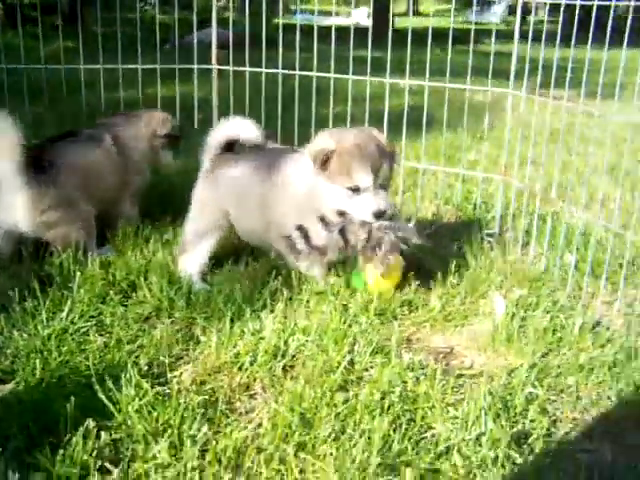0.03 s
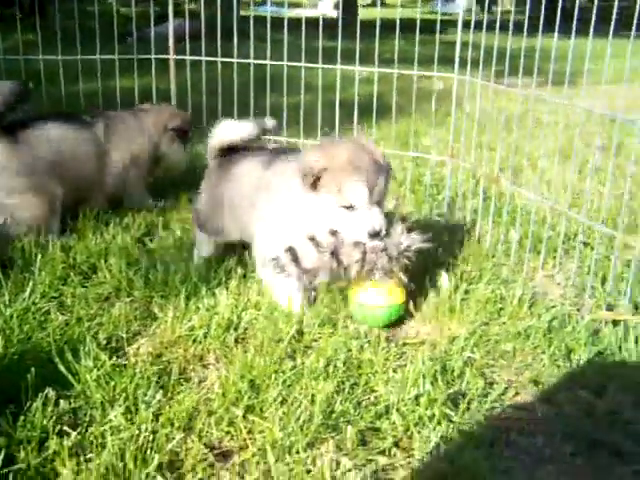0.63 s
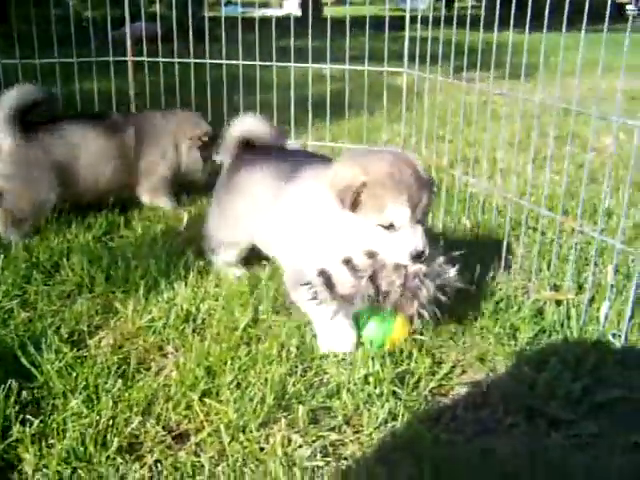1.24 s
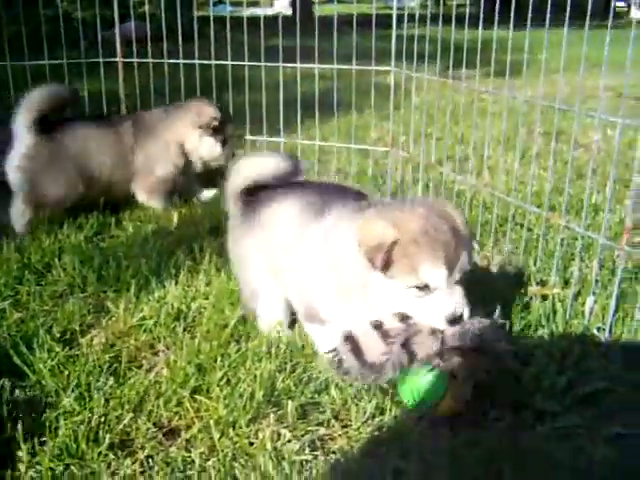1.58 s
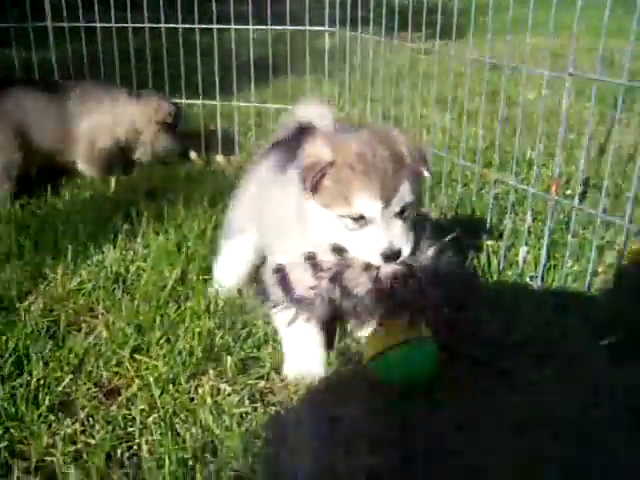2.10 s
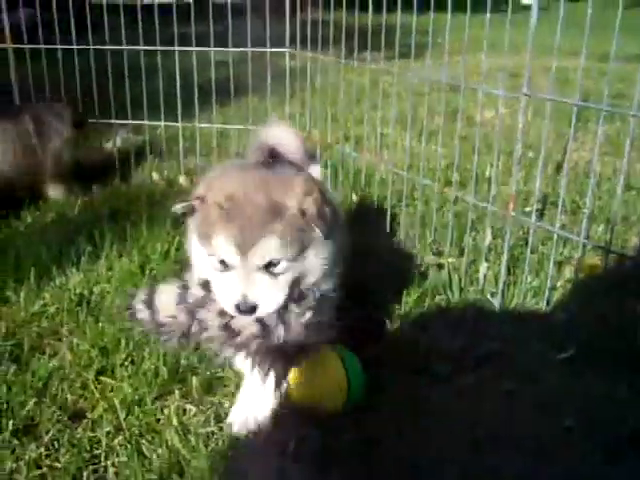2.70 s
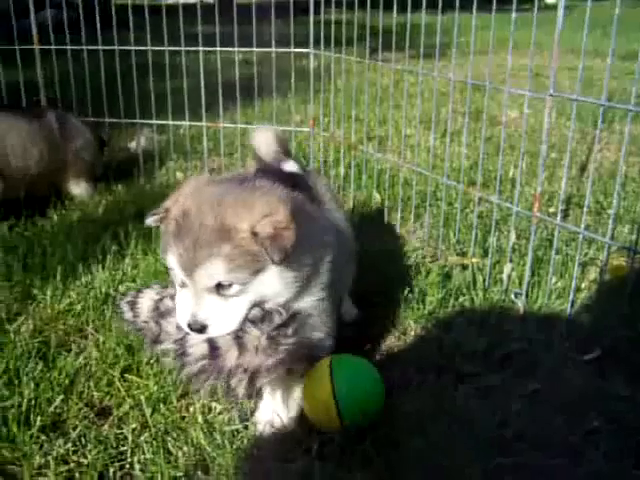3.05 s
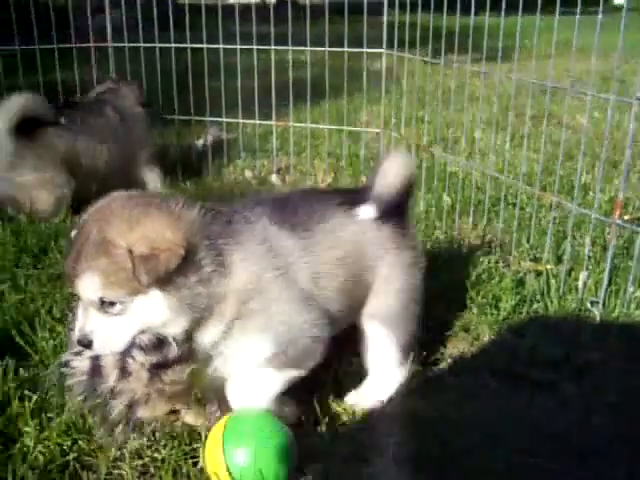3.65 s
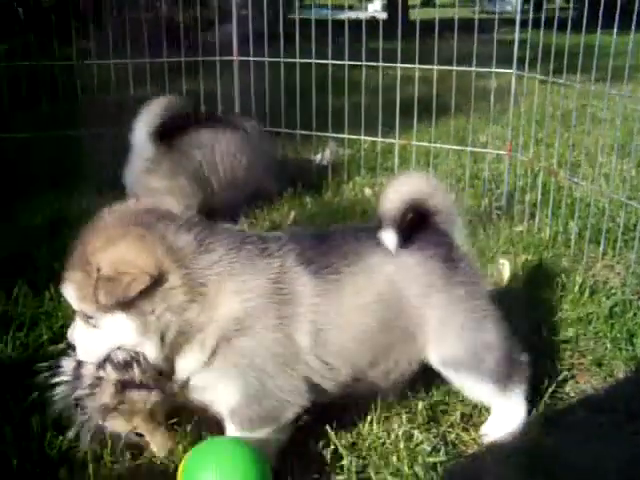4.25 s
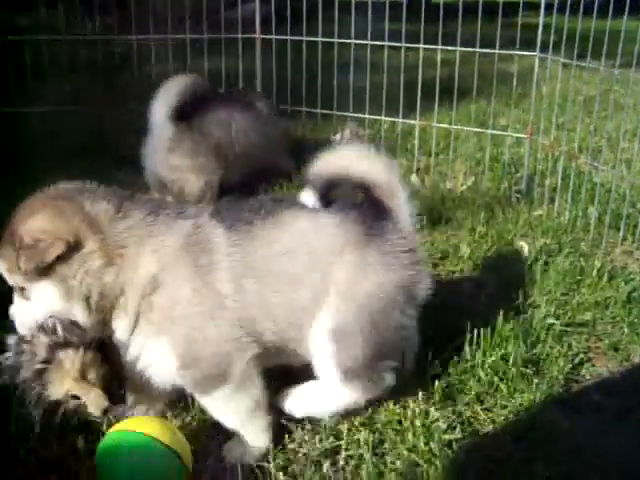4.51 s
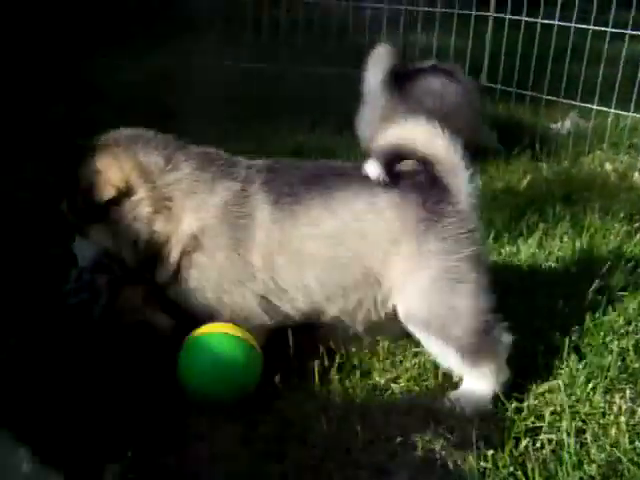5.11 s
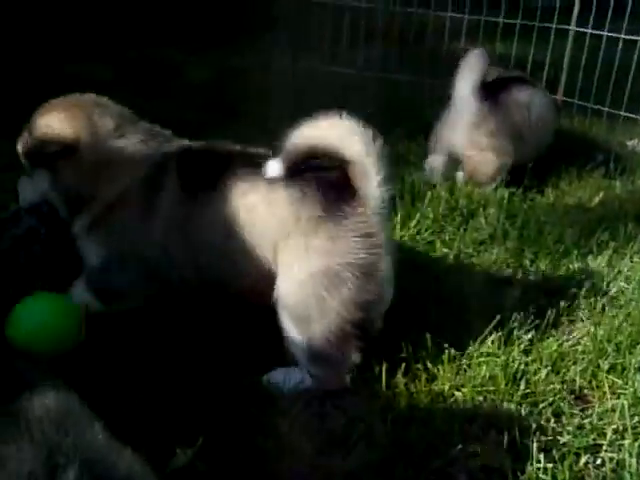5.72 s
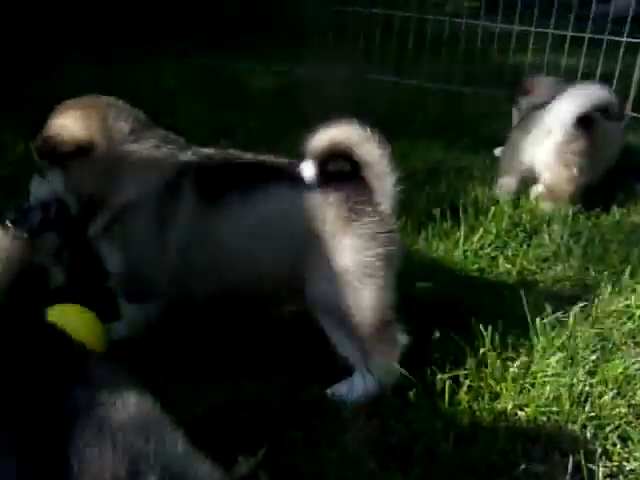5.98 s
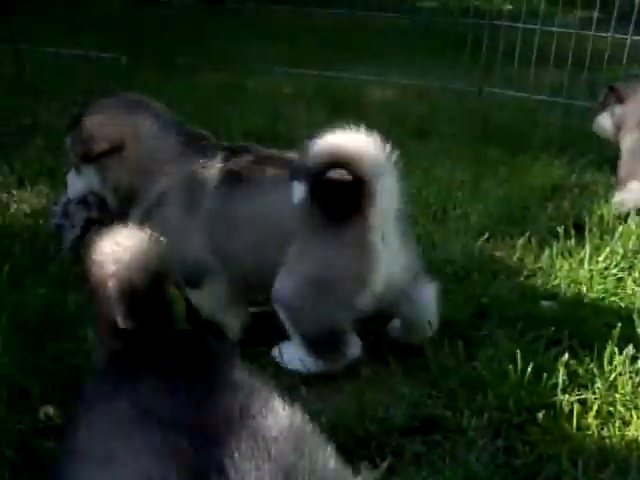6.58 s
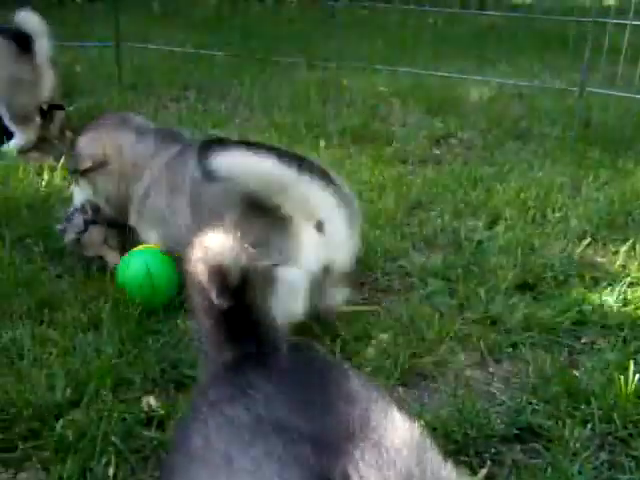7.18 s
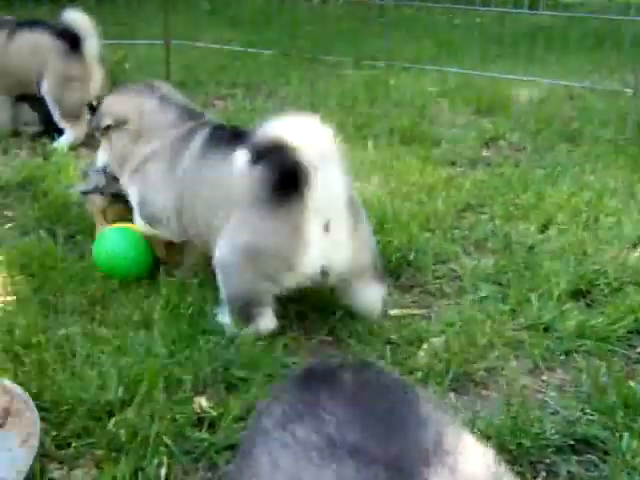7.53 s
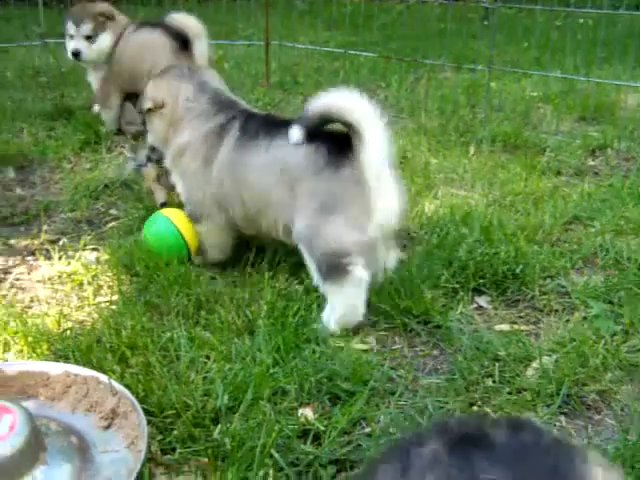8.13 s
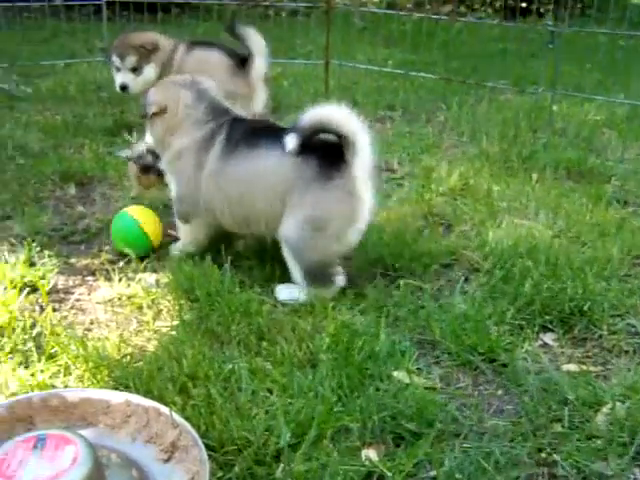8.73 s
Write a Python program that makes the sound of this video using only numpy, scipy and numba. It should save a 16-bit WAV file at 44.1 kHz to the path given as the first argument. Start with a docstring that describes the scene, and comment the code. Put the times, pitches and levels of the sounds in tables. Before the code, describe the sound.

Grass swishes and crackles under puppies' paws, then a close bird trills loudly and chips, above a low far-off engine hum.

```python
"""A bird close by gives one fast trill: rising whistles that slow and end in harsh two-voiced chips.
On the lawn, puppies with a soft toy and a ball brush through the grass and snap stalks; hard plastic
clacks near the microphone. Far off, an engine drones and a second bird calls thinly over a hiss of
leaves and traffic. Heard in mono from a small camera, whose shell rings when rubbed and whose gain
control ducks under the near bird."""
import sys
import numpy as np
from scipy import signal
from scipy.fft import rfft, irfft, next_fast_len
from scipy.io import wavfile
from scipy.ndimage import uniform_filter1d
from numba import njit

SR = 44100
rng = np.random.default_rng(int(sys.argv[2]) if len(sys.argv) > 2 else 0)


def inscribe(sig):
    """Save sig as 16-bit PCM at rate SR to the path in sys.argv[1].

    A 1-D sig is mono; a 2-D sig holds one channel per row.
    Samples are clipped to [-1, 1] before scaling.
    """
    pcm = np.round(np.clip(np.atleast_2d(sig).T, -1, 1) * 32767)
    wavfile.write(sys.argv[1], SR, pcm.astype(np.int16))


N = 386067
T = np.arange(N) / SR

# spectrum of grass blades brushing: frequency_hz, density_db
SWISH_SPECTRUM = [(1200, -26.5), (2100, -16), (2550, -4.5), (3000, -1), (3300, -2.5), (3800, 0), (4300, -1),
                  (4900, -8), (5800, -31.5)]
# spectrum of the crisp treble of the grass: frequency_hz, density_db
CRISP_SPECTRUM = [(3800, -22.5), (4700, -5), (5400, 9.5), (5750, -3), (6250, 2.5), (7000, -1.5),
                  (7600, -6.5), (8200, -29)]


def undb(db):
    """Decibels to gain."""
    return 10 ** (np.asarray(db) / 20)


def unit(x):
    """Scale to rms 1."""
    return x / np.sqrt(np.mean(x ** 2))


def curves(rows):
    """Each column after the times, joined by straight lines over the scene."""
    times, *columns = np.transpose(rows)
    return [np.interp(T, times, column) for column in columns]


def add(out, start_s, x):
    """Mix x into out from start_s on."""
    i = max(int(start_s * SR), 0)
    out[i:i + len(x)] += x[:N - i]


def colour(x, spectrum):
    """Give x a smooth spectrum that falls 34 dB an octave beyond its ends; rms 1."""
    hz, db = np.transpose(spectrum)
    size = next_fast_len(len(x))
    octave, known = np.log2(np.fft.rfftfreq(size, 1 / SR) + 1), np.log2(hz)
    outside = np.abs(octave - np.clip(octave, known[0], known[-1]))
    gain = undb(np.interp(octave, known, db) - 34 * outside)
    return unit(irfft(rfft(x, size) * gain, size)[:len(x)])


def walk(rate_hz):
    """Smooth random drift with a spread near 1."""
    hold = int(SR / rate_hz)
    steps = np.repeat(rng.standard_normal(N // hold + 1), hold)
    return 1.14 * uniform_filter1d(uniform_filter1d(steps, hold), hold)[:N]


def patchy(x, depth_db):
    """Let neighbouring narrow bands swell and sink on their own; rms 1."""
    _, _, bands = signal.stft(x, nperseg=512)
    patches = rng.standard_normal(bands.shape)
    for _ in range(2):
        patches = uniform_filter1d(uniform_filter1d(patches, size=4, axis=0), size=17, axis=1)
    return unit(signal.istft(bands * undb(depth_db * unit(patches)))[1][:N])


def crackle(spread_db, hiss):
    """Dense tiny clicks of unequal size over a smooth hiss."""
    clicks = rng.standard_normal(N) * (rng.random(N) < 0.06)
    sizes = undb(spread_db * np.minimum(rng.exponential(size=N), 4))
    return unit(clicks * sizes) + hiss * rng.standard_normal(N)


def ring(modes, pitch_factor=1):
    """Struck modes, each dying at its own rate."""
    t = np.arange(2048) / SR
    return sum(undb(db - 60 * t / t60) * np.sin(2 * np.pi * hz * pitch_factor * t)
               for hz, db, t60 in modes)


def whistle(length_s, pitches_hz, attack, release, rasp, tremble=0.7, tremble_hz=190):
    """A note bent through start, middle and end pitch; attack and release are shares of its length."""
    u = np.linspace(0, 1, int(length_s * SR))
    hz = np.polyval(np.polyfit([0, 0.5, 1], pitches_hz, 2), u)
    shake = np.interp(u * length_s, np.arange(200) * 0.0007, rng.standard_normal(200))
    phase = 2 * np.pi * np.cumsum(hz * (1 + rasp * shake)) / SR
    swell = np.sin(np.pi / 2 * np.clip(np.minimum(u / attack, (1 - u) / release), 0, 1))
    quiver = 1 + tremble * u * np.sin(2 * np.pi * (tremble_hz * length_s * u + rng.random()))
    return swell * quiver * np.sin(phase)


def scatter(x, delay_s, t60_s, level_db):
    """Diffuse echo that arrives after a delay and dies away."""
    t = np.arange(SR) / SR
    tail = rng.standard_normal(SR) * undb(-60 * t / t60_s)
    out = np.zeros(N)
    add(out, delay_s, signal.fftconvolve(x, tail / np.linalg.norm(tail))[:N])
    return out * undb(level_db)


def air(hiss_db=-31.06):
    """Even hiss of far leaves and traffic, over a low rush that grows toward the end."""
    # spectrum of the hiss: frequency_hz, density_db
    hiss_spectrum = [(100, -38), (170, -0.5), (250, -1), (542, -8), (712, -6), (892, -7.5), (1420, -5),
                     (2160, -6.5), (2500, -7.5), (2800, -18), (3180, -10), (3510, -7), (6890, -14.5),
                     (7970, -26), (10400, -49.5), (17500, -120)]
    # spectrum of the rush: frequency_hz, density_db
    rush_spectrum = [(200, -5), (330, 1), (500, 0.5), (800, -23.5)]
    # rise of the rush: time_s, level_db
    rush_levels = [(0, -57), (4.5, -55), (5.3, -42), (6.5, -38.5), (7.3, -38), (8.75, -38)]
    hiss = patchy(colour(rng.standard_normal(N), hiss_spectrum), depth_db=1.6)
    hiss *= undb(hiss_db + 0.69 * walk(4.5))
    rush = colour(rng.standard_normal(N), rush_spectrum) * undb(curves(rush_levels)[0])
    return hiss + rush


def far_engine(pitch_hz=80.33, slows_at_s=2.9, sag_hz_per_s=1.1, waver_hz=0.4, waver_db=0.47):
    """A distant engine holds its speed, then slows: three wavering tones sink over a rumble."""
    # spectrum of the rumble: frequency_hz, density_db
    rumble_spectrum = [(20, -20), (32, -10.5), (44, -3), (60, -2.5), (100, 3), (150, 0), (200, -4),
                       (300, -12.5), (500, -24), (900, -47.5)]
    # loudness of the rumble and the low tone alike: time_s, level_db
    drone_levels = [(0, -32.5), (1.5, -34.5), (2.9, -32), (4.8, -33), (5.3, -29.5), (6.3, -30),
                    (6.7, -26.5), (7.2, -32), (8.75, -31.5)]
    # swells of the high tone: time_s, level_db
    high_levels = [(0, -35.5), (1.35, -38), (1.9, -31), (2.4, -35), (2.9, -26.5), (3.65, -32.5), (4, -26.5),
                   (4.26, -41), (4.9, -35.5), (5.2, -26.5), (5.95, -36), (6.65, -25.5), (7.1, -32),
                   (8.75, -30.5)]
    low_hz = pitch_hz - sag_hz_per_s * np.maximum(T - slows_at_s, 0)
    drone_db, high_db = curves(drone_levels)[0], curves(high_levels)[0]
    out = undb(drone_db) * colour(rng.standard_normal(N), rumble_spectrum)
    for hz, db in [(low_hz / 2, drone_db - 15), (low_hz, drone_db), (low_hz * 1.6, high_db)]:
        phase = 2 * np.pi * np.cumsum(hz + waver_hz * walk(8)) / SR
        out += np.sqrt(2) * undb(db + waver_db * walk(10)) * np.sin(phase)
    return out


def far_bird(octave_db=-11):
    """Thin distant calls with a faint octave, half lost in their own echo."""
    # whistled calls: start_s, length_s, start_hz, middle_hz, end_hz, level_db
    calls = [(8.187, 0.056, 3180, 3255, 3320, -21), (8.225, 0.092, 3350, 3550, 3700, -29),
             (8.263, 0.053, 3150, 3200, 3130, -21.5)]
    song = np.zeros(N)
    for start_s, length_s, *pitches_hz, db in calls:
        for harmonic, gain in [(1, undb(db)), (2, undb(db + octave_db))]:
            tone = whistle(length_s, harmonic * np.array(pitches_hz), attack=0.26, release=0.27, rasp=0.043)
            add(song, start_s, gain * tone)
    return song + scatter(song, delay_s=0.023, t60_s=0.45, level_db=-7)


def camera_rubs(gain_db=-6.5):
    """Gritty friction swells and fades in the narrow resonances of the camera's plastic shell."""
    # rubs on the shell: start_s, length_s, pitch_hz, relative_db
    rubs = [(1.841, 0.12, 3660, -25.5), (1.963, 0.11, 3800, -27), (2.341, 0.052, 3630, -23.5),
            (2.467, 0.05, 3680, -27.5), (3.34, 0.092, 3540, -21), (3.935, 0.056, 3640, -20.5),
            (4.303, 0.1, 3230, -21), (4.715, 0.11, 3620, -24), (7.19, 0.07, 3870, -21.5),
            (7.55, 0.2, 3760, -28)]
    # resonances of the shell: pitch_factor, width_hz, relative_db
    shell_modes = [(.785, 330, -5.5), (1, 260, 2.5), (1.92, 500, -19.5)]
    out, grit = np.zeros(N), crackle(spread_db=7.5, hiss=0.22)
    for start_s, length_s, pitch_hz, db in rubs:
        friction = grit[int(start_s * SR):][:int(length_s * SR)]
        friction = friction * np.sqrt(np.hanning(len(friction)))
        for factor, width_hz, mode_db in shell_modes:
            b, a = signal.iirpeak(pitch_hz * factor, pitch_hz * factor / width_hz, fs=SR)
            ringing = unit(signal.lfilter(b, a, signal.lfilter(b, a, friction)))
            add(out, start_s, undb(db + mode_db + gain_db) * ringing)
    return out


def grass(attack_share=0.25):
    """Blades brush and crackle as the puppies step and drag the toy over the lawn."""
    # soft shuffling under the strokes: time_s, swish_db, crisp_db
    shuffle = [(0, -42, -44), (1.3, -33.5, -38.5), (3.1, -34.5, -39.5), (4.1, -32, -38), (5, -32, -41.5),
               (5.6, -25.5, -34), (6.4, -26, -35.5), (6.9, -26.5, -35), (7.4, -32, -39.5), (8, -32, -49),
               (8.75, -29.5, -45)]
    # strokes of a paw or the toy: start_s, length_s, swish_db, crisp_db
    strokes = [(0.135, 0.33, -30, -32), (0.664, 0.23, -33, -33), (1.077, 0.033, -24.5, -26),
               (1.884, 0.13, -27.5, -33), (1.996, 0.027, -36, -23.5), (2.25, 0.42, -30, -43),
               (2.736, 0.14, -32, -34), (2.83, 0.14, -32, -32), (3.178, 0.24, -31.5, -30),
               (3.318, 0.23, -26.5, -33), (3.54, 0.091, -29.5, -32), (3.7, .17, -32, -34),
               (3.95, 0.098, -28, -28.5), (4.202, 0.36, -26.5, -30), (4.28, 0.19, -26.5, -32),
               (4.45, .14, -27, -36), (4.646, 0.2, -27.5, -26.5), (4.749, 0.22, -24.5, -30.5),
               (5.124, 0.11, -24, -31.5), (5.215, 0.31, -24.5, -30), (5.41, 0.31, -24.5, -39),
               (5.67, 0.097, -19, -29), (5.797, .06, -14.5, -27), (6.675, 0.13, -18.5, -37),
               (7.104, 0.22, -27, -31), (7.184, 0.22, -23, -29.5), (7.403, 0.25, -27.5, -45),
               (7.518, 0.25, -23.5, -28.5), (7.698, 0.26, -28.5, -35), (8.115, 0.28, -45, -37),
               (8.626, 0.2, -29.5, -30)]
    swish_power, crisp_power = undb(curves(shuffle)) ** 2
    for start_s, length_s, swish_db, crisp_db in strokes:
        u = np.linspace(0, 1, int(length_s * SR))
        swell = np.sin(np.pi / 2 * np.interp(u, [0, attack_share, 1], [0, 1, 0])) ** 2
        add(swish_power, start_s, undb(swish_db) ** 2 * swell)
        add(crisp_power, start_s, undb(crisp_db) ** 2 * swell)
    flutter = walk(70)
    # the colour shifts as the rubbing spot changes
    swish = patchy(colour(crackle(spread_db=3.5, hiss=0.98), SWISH_SPECTRUM), depth_db=2.5)
    crisp = patchy(colour(crackle(spread_db=5.5, hiss=0.74), CRISP_SPECTRUM), depth_db=4.5)
    swish *= undb(2.3 * flutter) * np.sqrt(swish_power)
    crisp *= undb(3.5 * flutter) * np.sqrt(crisp_power)
    return swish + crisp


def stalk_snaps(decay_s=0.0041, faint_count=9, faint_db=(-26.5, -27.5, -31), spread_db=2):
    """Stalks break under paws, each a dull knock and a short crack; faint ones come at random."""
    # breaking stalks: start_s, crack_db, knock_db, treble_db
    snaps = [(.864, -33, -18, -39), (1.081, -22, -25, -19), (1.455, -16, -10, -21), (1.462, -23, -17, -20),
             (1.661, -17.5, -19.5, -40), (1.875, -30, -30, -17), (2.009, -19, -29, -12.5),
             (2.89, -14, -18, -30), (2.97, -16, -35, -28), (3.218, -18, -22, -28), (3.492, -17.5, -38, -28),
             (3.543, -11, -34, -30), (3.564, -13.5, -35, -31), (3.667, -19, -30, -24),
             (3.714, -15, -28, -24), (3.788, -16, -24, -28), (3.832, -17, -30, -39),
             (4.037, -12, -16.5, -33), (4.667, -27, -38, -18.5), (4.738, -17.5, -19.5, -18),
             (4.873, -12, -19, -31), (5.451, -6, -16, -16), (5.457, -10.5, -14, -27),
             (7.126, -15, -22, -36), (7.286, -26, -16, -35), (8.635, -28, -15.5, -36)]
    # modes of the dull knock: pitch_hz, level_db, t60_s
    knock_modes = [(340, -9.5, 0.016), (740, 2, 0.0064), (1250, -0.5, 0.0014), (2010, 5.5, 0.0032)]
    faint_snaps = [(rng.uniform(0, N / SR), *rng.normal(faint_db, spread_db)) for _ in range(faint_count)]
    out, t = np.zeros(N), np.arange(2048) / SR
    for start_s, crack_db, knock_db, treble_db in snaps + faint_snaps:
        crack = undb(crack_db) * colour(rng.standard_normal(len(t)), SWISH_SPECTRUM)
        treble = undb(treble_db) * colour(rng.standard_normal(len(t)), CRISP_SPECTRUM)
        knock = undb(knock_db) * ring(knock_modes)
        add(out, start_s, (crack + treble) * np.exp(-t / decay_s) + knock)
    return out


def plastic_clacks():
    """Sharp contacts near the microphone ring a few quickly damped modes of hard plastic."""
    # contacts: start_s, level_db, pitch_factor
    contacts = [(5.3871, 6, 1.16), (5.3897, 3, 1.05), (5.4046, -11, 1.1), (5.5409, 5, 1.67),
                (5.9140, 10.5, 1.58), (5.9152, -1.5, 0.95), (8.5061, -2, 1.06), (8.541, -3.5, 1.003),
                (8.5450, -12, 0.9)]
    # modes of the plastic: pitch_hz, level_db, t60_s
    plastic_modes = [(364, -16, 0.0072), (770, -12, 0.0041), (2170, -14, 0.0021), (2540, -1.5, 0.015),
                     (3120, -6.5, 0.0078), (3310, -8.5, 0.019), (4180, -20, 0.0096)]
    out = np.zeros(N)
    for start_s, db, pitch_factor in contacts:
        add(out, start_s, undb(db) * ring(plastic_modes, pitch_factor))
    return out


def trill_notes(upsweep_share=0.56, crest_share=0.48, bow_hz=44.6):
    """Each note sweeps up, easing off, then bends over in a crest; yields (start_s, sound)."""
    # notes of the trill: start_s, length_s, pitch_hz, climb_hz, upsweep_db, crest_db
    notes = [(5.445, .034, 4030, 606, -13, -19), (5.508, .042, 3930, 700, -4.5, -17),
             (5.579, 0.07, 4044, 330, -3, -8.5), (5.659, 0.055, 4030, 330, -1, -3.5),
             (5.74, 0.056, 4090, 595, 0, -7), (5.826, 0.044, 4073, 500, -1, -4),
             (5.922, 0.043, 4010, 423, -2, -0.5), (6.001, 0.049, 4007, 564, -1.5, 2),
             (6.086, 0.054, 4010, 560, 0, -2), (6.189, 0.04, 4023, 704, -1, -2.5),
             (6.292, 0.038, 3815, 636, -3, -4), (6.411, 0.025, 3700, 1090, -4, -2)]
    # pitch of the crest against the note's: start_factor, middle_factor, end_factor
    crest_bend = [1.045, 1.087, 1.065]
    for start_s, length_s, hz, climb_hz, upsweep_db, crest_db in notes:
        upsweep_hz = [hz - climb_hz / 2, hz + bow_hz, hz + climb_hz / 2]
        upsweep = whistle(length_s * upsweep_share, upsweep_hz, attack=0.33, release=0.3, rasp=0.011)
        yield start_s, undb(upsweep_db) * upsweep
        crest_hz = hz * np.array(crest_bend)
        crest = whistle(length_s * crest_share, crest_hz, attack=0.3, release=0.44, rasp=0.011)
        yield start_s + length_s * (1 - crest_share), undb(crest_db) * crest


def chip_notes(arch_s=0.0209, arch_hz=(2346, 3850, 3350), rasp_hz=(5480, 4330, 3920)):
    """Each chip has two voices, a low arch and a falling rasp; yields (start_s, sound)."""
    # closing chips: start_s, arch_db, rasp_db, rasp_lag_s, rasp_length_s, arch_roughness
    chips = [(6.521, -5.5, -6, 0.011, 0.023, .015), (6.62, -4.5, -10.5, 0.0052, 0.04, 0.017),
             (6.75, -7, -8.5, -.009, .04, 0.1), (6.872, -6, -7.5, -0.00097, .038, 0.088),
             (7.001, -16, -4, 0.0015, .019, 0.076)]
    for start_s, arch_db, rasp_db, lag_s, rasp_s, roughness in chips:
        arch = whistle(arch_s, arch_hz, attack=0.46, release=0.53, rasp=roughness)
        yield start_s, undb(arch_db) * arch
        rasp = whistle(rasp_s, rasp_hz, attack=0.78, release=0.25, rasp=0.11)
        yield start_s + lag_s, undb(rasp_db) * rasp


def near_bird(bounce_db=-10):
    """The trill and its chips, close by; near reflections beat against each sweep, trees add a tail."""
    song = np.zeros(N)
    for start_s, sound in [*trill_notes(), *chip_notes()]:
        add(song, start_s, sound)
        for lag_s in rng.uniform([0.003, 0.008], [0.008, 0.018]):
            add(song, start_s + lag_s, undb(bounce_db) * sound)
    trees = scatter(song, delay_s=0.022, t60_s=0.5, level_db=-11.5)
    early_echo = scatter(song, delay_s=0.012, t60_s=0.26, level_db=-11)
    return song + early_echo + trees


def scene():
    """All sources, near and far, at the one microphone."""
    birds = near_bird() + far_bird()
    lawn = grass() + camera_rubs() + stalk_snaps() + plastic_clacks()
    return (birds + lawn + far_engine() + air())[None]


@njit
def follow(x, attack, release):
    """Level detector that rises and sinks at separate rates."""
    out, level = np.empty(len(x)), 0.
    for i in range(len(x)):
        level += (x[i] - level) * (attack if x[i] > level else release)
        out[i] = level
    return out


def record(dry, ceiling=0.37, attack_s=0.0045, release_s=0.33, top_hz=8100):
    """The small camera: microphone port resonances, gain control, clipping and a narrow bandwidth."""
    # peaks and a dip of the microphone's port: centre_hz, width_hz, gain_db
    port_resonances = [(3730, 150, 4), (5400, 880, -2), (6040, 240, 3.5)]
    x = dry[0]
    for hz, width_hz, db in port_resonances:
        band = signal.lfilter(*signal.iirpeak(hz, hz / width_hz, fs=SR), x)
        x = x + (undb(db) - 1) * band
    level = follow(np.abs(x), 1 / (attack_s * SR), 1 / (release_s * SR))
    ducked = x * ceiling / np.maximum(level, ceiling)
    lowpass = signal.ellip(10, 0.2, 80, top_hz, fs=SR, output="sos")
    return signal.sosfilt(lowpass, np.clip(ducked, -1, 1))[None]


dry = scene()
out = record(dry)
inscribe(out)
```